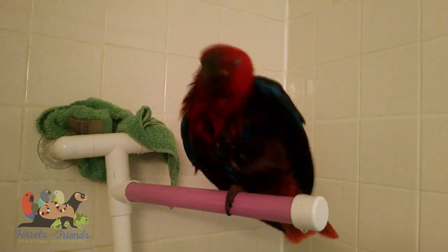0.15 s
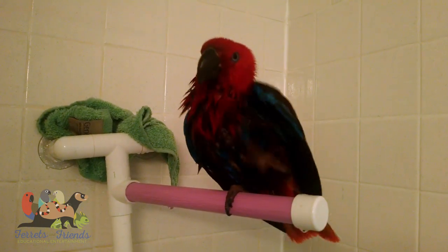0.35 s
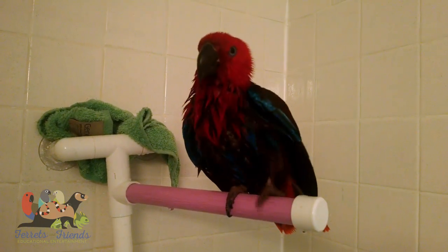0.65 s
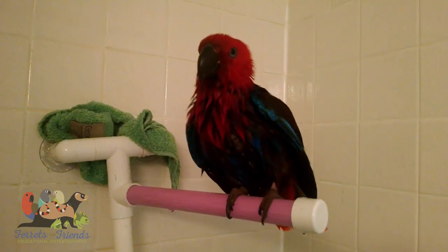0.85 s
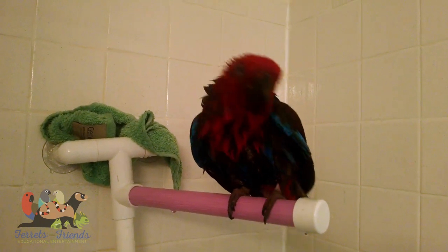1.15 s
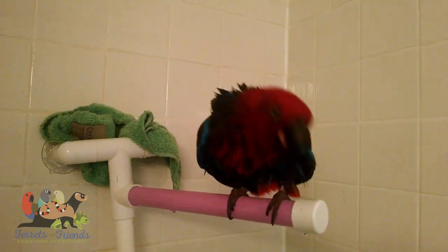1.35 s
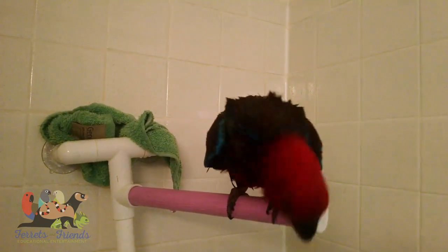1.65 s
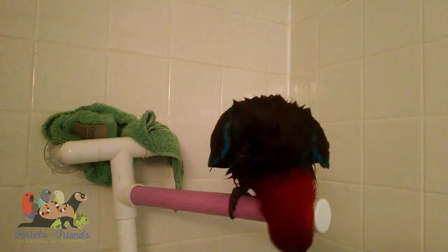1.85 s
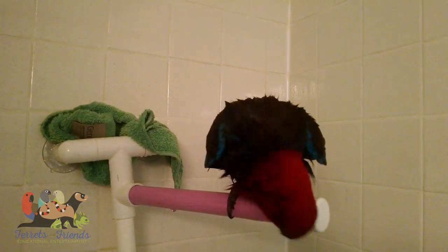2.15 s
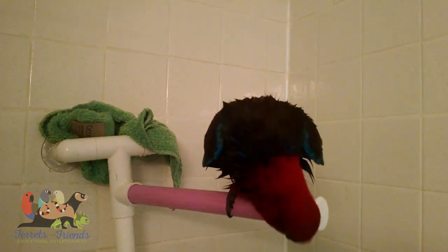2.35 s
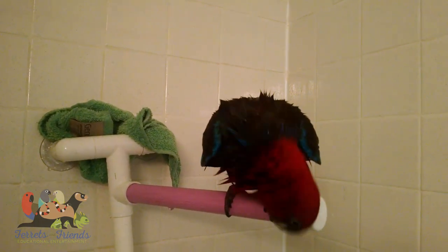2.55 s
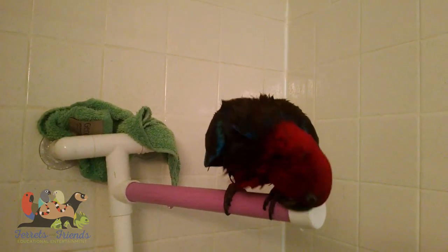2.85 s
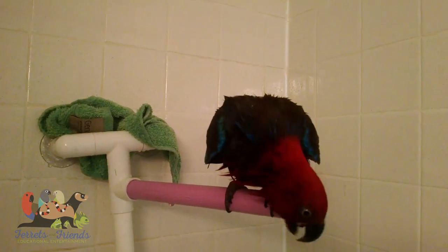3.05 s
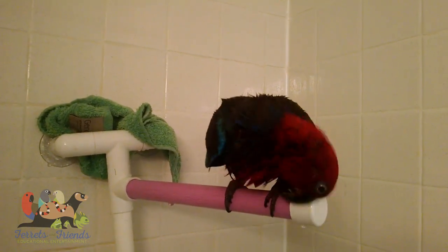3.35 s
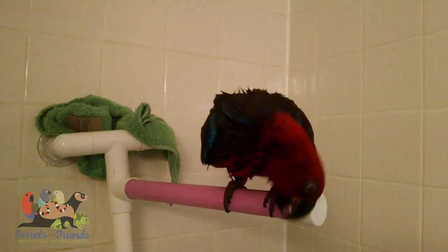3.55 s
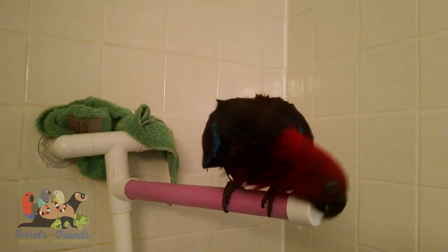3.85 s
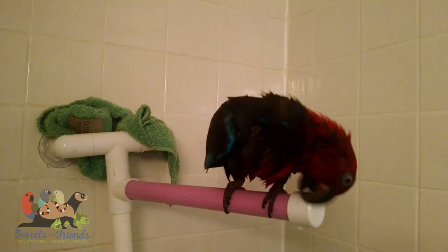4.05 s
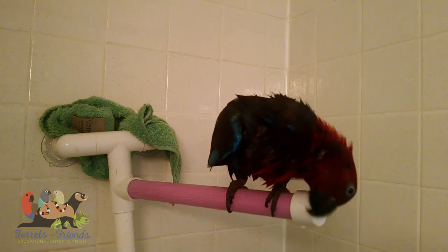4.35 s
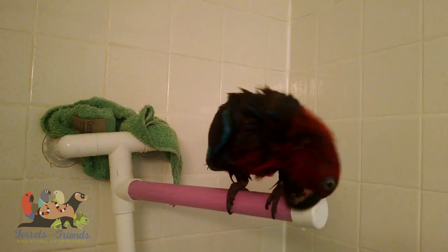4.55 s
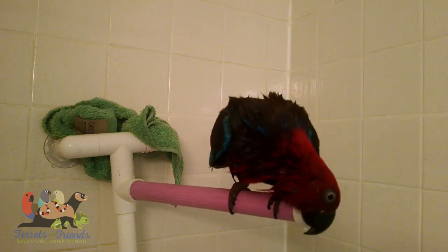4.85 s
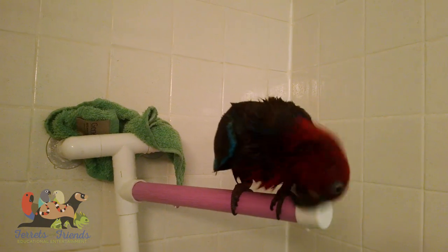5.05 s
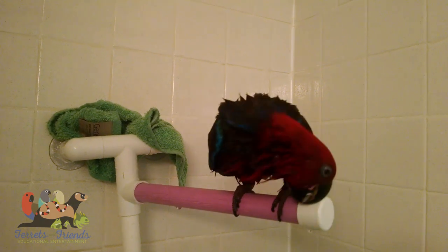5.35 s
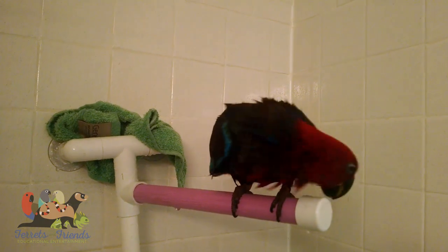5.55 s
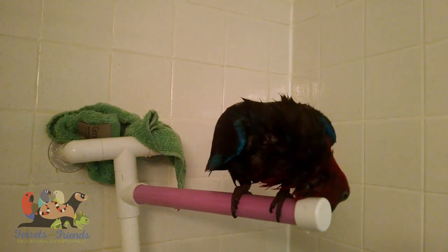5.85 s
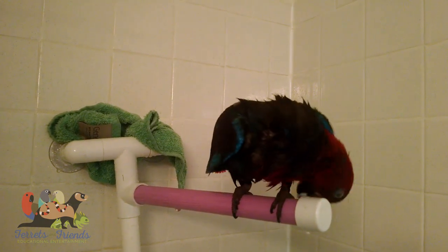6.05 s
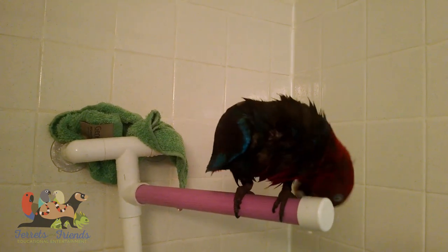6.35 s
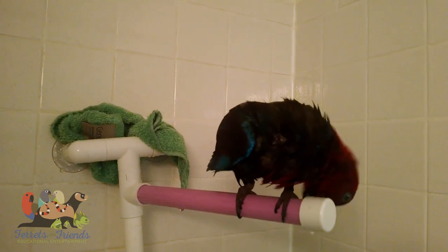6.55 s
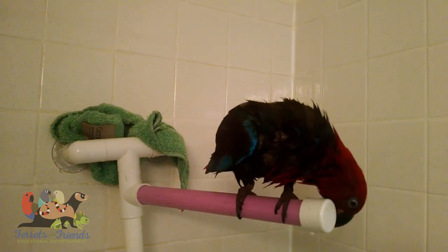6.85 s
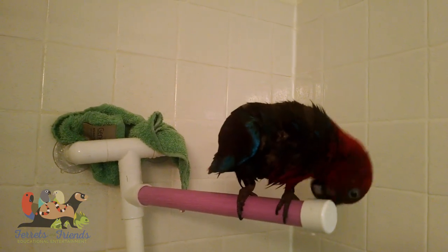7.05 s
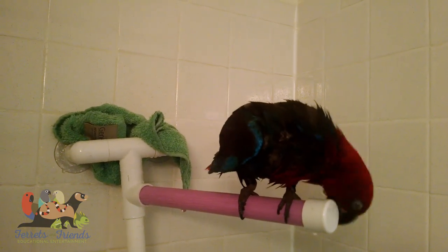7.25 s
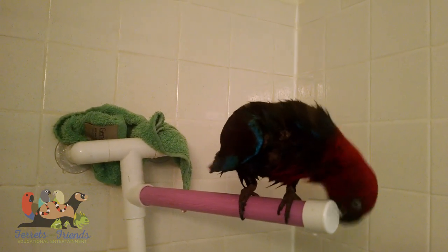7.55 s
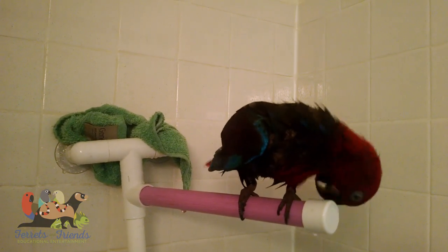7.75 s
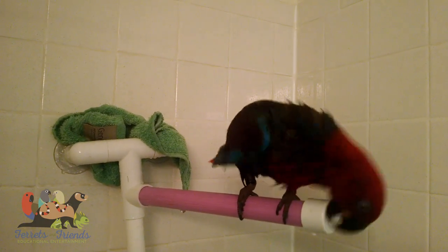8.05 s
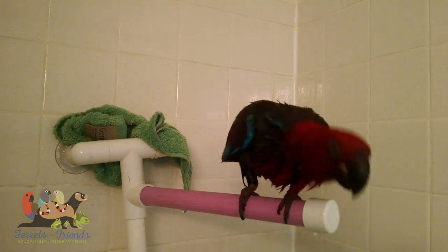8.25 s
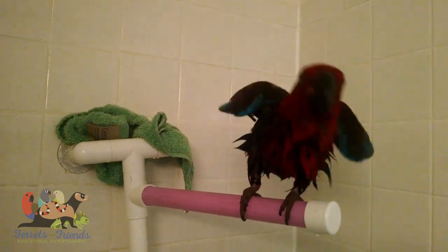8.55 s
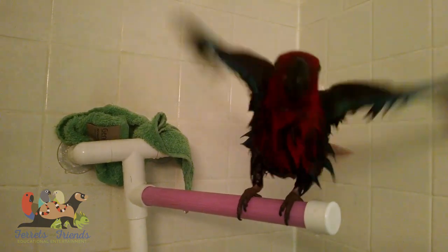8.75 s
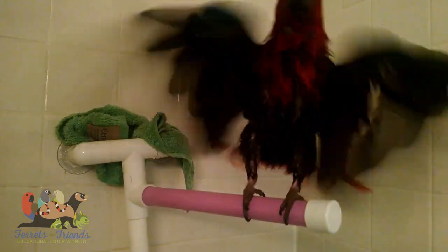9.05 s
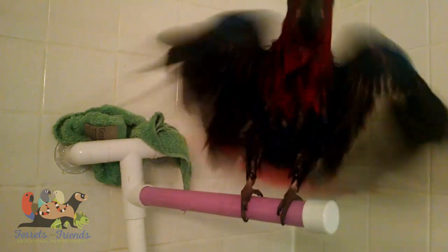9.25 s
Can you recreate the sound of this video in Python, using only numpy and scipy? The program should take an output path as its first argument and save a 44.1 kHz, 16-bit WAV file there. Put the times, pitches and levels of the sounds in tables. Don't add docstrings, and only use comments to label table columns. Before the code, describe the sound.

A steady fan drones in a tiled shower stall while a wet parrot's beak clicks and scrapes on hollow plastic, then wings flap.

```python
import sys
import numpy as np
from scipy import signal
from scipy.fft import rfft, irfft, next_fast_len
from scipy.io import wavfile
from scipy.ndimage import uniform_filter1d, map_coordinates

SR = 44100
rng = np.random.default_rng(int(sys.argv[2]) if len(sys.argv) > 2 else 0)


def bounce(signal):
    frames = np.transpose(np.atleast_2d(signal))
    limited = np.clip(frames, -1, 1)
    pcm = np.round(limited * 32767).astype(np.int16)
    wavfile.write(sys.argv[1], SR, pcm)


def makeup_ratio(level_db):
    decades = np.asarray(level_db, float) / 20
    return 10 ** decades


N = 414981


def unit(x):
    return x / np.sqrt(np.mean(x ** 2) + 1e-20)


def along(points, hz):
    f, v = np.transpose(points)
    return np.interp(np.log(hz + 1), np.log(f + 1), v)


def curves(rows):
    s, *cols = np.transpose(rows)
    return [np.interp(np.arange(N) / SR, s, c) for c in cols]


def wobble(rate):
    knots = rng.standard_normal(int(N * rate / SR) + 4)
    return map_coordinates(knots, [np.arange(N) * rate / SR])


def filtered(x, response):
    m = next_fast_len(N + SR // 2)
    return irfft(rfft(x, m) * response(np.fft.rfftfreq(m, 1 / SR)), m)[..., :N]


def resonances(modes, f):
    total = 0
    for k, (c, w, db) in enumerate(modes):
        total = total + (-1) ** k * makeup_ratio(db) * 1j * f * w / (c * c - f * f + 1j * f * w)
    return total


def diffuse(gain, alike):
    def shares(hz):
        turn = np.arccos(np.clip(along(alike, hz), -1, 1)) / 2
        return gain(hz) * np.array([np.cos(turn), np.sin(turn)])

    mid, side = filtered(rng.standard_normal((2, N)), shares)
    return np.array([mid + side, mid - side])


def fan():
    # (frequency [Hz], width [Hz], level [dB])
    stall = [(27.6, 10, -4), (60, 24, -7.5), (94.1, 5.8, -1), (119, 37, -11.5), (246.7, 14, -11),
             (266.7, 14.8, -6), (351.8, 22, 0.55), (410, 10.3, -6.5), (450.7, 36, -7.5), (492, 41, 0.5),
             (530.6, 9.7, 2.5), (583, 19, 0), (617, 24, -5), (651, 13.6, -10),
             (734.4, 23, -12.5), (788, 27, -16), (899, 17, -16), (984, 9.4, -18), (1360, 22, -56),
               (1650, 290, -31.5)]
    # (frequency [Hz], level [dB per Hz])
    air_colour = [(20, -46), (60, -18.5), (200, -23.5), (400, -26), (600, -19.5), (1000, -31), (1700, -49),
                  (2200, -42), (4500, -45), (7500, -48), (11000, -44.5), (15500, -50.5)]
    # (frequency [Hz], likeness [0-1])
    air_alike = [(30, .78), (100, .88), (250, .9), (450, .6), (900, .55), (1500, .3), (3000, .05)]
    # (frequency [Hz], likeness [0-1])
    modes_alike = [(30, .85), (120, .975), (270, .99), (360, .985), (530, .8), (750, .7), (1400, .5)]
    # (time [s], level change [dB])
    sway = [(0, 1.5), (1, -0.5), (2, -4), (2.6, 0), (3.5, 0), (4.5, 5.5), (5.5, 1.5), (6.5, 2.5), (7.5, -2),
            (8.5, -4), (9.41, 6)]

    def peaks(hz):
        power = sum(makeup_ratio(2 * db) / (1 + (2 * (hz - c) / w) ** 2) ** 1.69 for c, w, db in stall)
        return np.sqrt(power)

    drone_db = -37.5 - 0.5 * wobble(2.54)
    rumble_db = -48 + curves(sway)[0] + 0.5 * wobble(4.02)
    drone = makeup_ratio(drone_db) * unit(diffuse(peaks, modes_alike))
    air = makeup_ratio(-9.5 + 0.6 * wobble(3)) * diffuse(lambda hz: makeup_ratio(along(air_colour, hz)), air_alike)
    rumble = unit(diffuse(lambda hz: hz / (hz + 8) / (1 + (hz / 30) ** 3.1), air_alike))
    hum_phase = 2 * np.pi * 119.6 * np.arange(N) / SR + 1.76 * wobble(7)
    hum = makeup_ratio(-49.5 + 2.55 * wobble(6.5)) * np.sin(hum_phase)
    return drone + hum + air + makeup_ratio(rumble_db) * rumble


def swells(rows, sudden, rest_db, rest_bright_db):
    rise_share, sudden_rise_share = 0.52, 0.02
    fade_db = 10.5
    t = np.arange(0, N, 32) / SR
    s, db, bright_db, length = np.transpose(rows + sudden)[:, :, None]
    share = np.array([rise_share] * len(rows) + [sudden_rise_share] * len(sudden))[:, None]
    power = makeup_ratio(2 * (db - fade_db * np.abs(t - s) / np.where(t < s, length * share, length)))
    bright_power = power * makeup_ratio(2 * bright_db)
    dull, bright = [np.interp(np.arange(N) / SR, t, p.sum(axis=0)) for p in (power, bright_power)]
    rest = makeup_ratio(2 * rest_db) * np.ones(N)
    dull, bright = dull + rest, bright + rest * makeup_ratio(2 * rest_bright_db)
    return 10 * np.log10(dull), 10 * np.log10(bright / dull)


def rustle(level_db, bright_db, grain_db):
    # (frequency [Hz], level [dB per Hz])
    keratin = [(700, -9), (1300, -0.5), (3000, 10), (4500, 3.5), (7000, 12), (10000, 10.5), (13000, 5.5),
               (16000, -2.5)]
    # (frequency [Hz], level [dB per Hz])
    feather = [(2000, -18), (5000, 21.5), (6500, 13), (9000, 20.5), (11000, 13), (13000, -1), (16000, -24)]
    uneven = np.array([0.4 * wobble(70) + wobble(500), 0.35 * wobble(60) + wobble(500)])
    grains = rng.standard_normal((2, N)) * makeup_ratio(grain_db * uneven)
    dull = unit(filtered(grains[0], lambda hz: makeup_ratio(along(keratin, hz))))
    bright = unit(filtered(grains[1], lambda hz: makeup_ratio(along(feather, hz))))
    return makeup_ratio(level_db) * (dull + makeup_ratio(bright_db - 14.5) * bright)


def rubbing():
    # (time [s], level [dB])
    restless = [(0, -60), (.4, -75), (1, -70), (1.7, -61), (2.1, -75), (3.1, -65), (4, -62.5), (5, -68),
                (5.8, -62.5), (8.2, -65.5), (9.41, -58)]
    # (time [s], level [dB], brightness [dB], length [s])
    strokes = [(0.0, -47, -7, 0.033), (.1, -52.5, 9, 0.54), (.58, -49.5, 17, 0.015), (1.49, -68, 25, 0.026),
               (1.84, -61.5, 14, 0.14), (2.2, -54.5, 14, 0.17), (2.51, -60, 16, 0.034),
               (2.86, -54.5, 12, 0.088), (3.62, -62, -5, 0.12), (4.2, -50.5, 21.5, 0.031),
               (4.44, -65, 14, 0.25), (5.56, -57, 9, 0.24), (6.37, -40, 12.5, 0.03),
               (6.51, -48.5, 14.5, 0.14), (6.67, -45, 17, 0.028), (6.81, -51, 17, 0.047),
               (6.93, -46.5, 10, 0.033), (7.16, -59, 7, 0.041), (7.3, -54, 13.5, 0.19),
               (7.44, -48.5, 14, 0.064), (7.65, -42.5, 10, 0.021), (7.81, -52, 15, 0.12),
               (7.98, -48, 17, 0.02), (8.14, -53, 15, 0.029), (8.3, -68, 21, 0.1)]
    # (time [s], level [dB], brightness [dB], length [s])
    struck = [(2.16, -46.5, 19, 0.061), (3.388, -58, 2, 0.11), (4.077, -41, 14, 0.04),
              (5.071, -58, 16, 0.12), (5.321, -61, 13, 0.29), (6.089, -44, 15, 0.051),
              (6.203, -51, 17, 0.039), (6.335, -48, 17, .06)]
    rest_db, = curves(restless)
    level_db, bright_db = swells(strokes, struck, rest_db, rest_bright_db=9)
    return rustle(level_db, bright_db, grain_db=3.5)


def sparks():
    # (time [s], peak level [dB])
    flashes = [(0.0604, -42.5), (0.1406, -39), (0.2254, -48), (0.3087, -41), (1.4714, -51), (2.1585, -43),
               (4.0776, -31), (4.2028, -40), (5.0704, -25), (5.5638, -39), (6.0886, -35), (6.2018, -30),
               (6.3345, -40), (6.6692, -40), (7.9583, -33), (8.1414, -40), (8.9361, -28), (9.0224, -28),
               (9.1521, -25), (9.3182, -32)]
    length_s, edge_hz, gain_db = 0.0028, 9000, -3
    out, t = np.zeros(N + SR), np.arange(SR // 100) / SR
    for s, db in flashes:
        burst = np.exp(-(t / length_s) ** 2) * rng.standard_normal(len(t))
        out[round(s * SR):][:len(t)] += makeup_ratio(db + gain_db) * burst
    return filtered(out[:N], lambda f: (1j * f / edge_hz / (1 + 1j * f / edge_hz)) ** 2)


def gritty_strokes(rows, grit_db, size):
    out, t = np.zeros(N + SR), np.arange(-SR // 8, SR // 8) / SR
    for s, spread, hz, db, edge in rows:
        noise = rng.standard_normal(len(t))
        unevenness = unit(uniform_filter1d(rng.standard_normal(len(t)), size))
        grit = noise * makeup_ratio(grit_db * unevenness)
        edge = max(edge, 1.03)
        band = signal.butter(2, [hz / edge, min(hz * edge, 15000)], "band", fs=SR)
        stroke = makeup_ratio(db) * np.exp(-(t / spread) ** 2) * unit(signal.lfilter(*band, grit))
        at = round((s + t[0]) * SR)
        out[max(at, 0):at + len(t)] += stroke[max(-at, 0):]
    return out[:N]


def blunted(x):
    return filtered(x, lambda f: 1 / (1 + 1j * f / 12000) ** 2)


def crunches():
    # (middle [s], spread [s], frequency [Hz], level [dB], band edge over centre [ratio])
    bites = [(.0605, 0.0033, 5550, -31.5, 2.0), (.1425, 0.003, 6500, -31, 1.9),
             (.2265, 0.004, 5940, -35.5, 1.5), (.3112, 0.0041, 6000, -38, 1.8),
             (2.2055, 0.003, 5000, -37, 2), (4.2022, 0.0021, 6040, -29, 1.9),
             (5.4075, 0.012, 9500, -45.5, 1.3), (5.645, 0.007, 4320, -44.5, 1.1),
             (6.0095, 0.0092, 4170, -43.5, 1.45), (6.094, 0.0058, 6000, -29.5, 1.5),
             (6.337, 0.0024, 4800, -34, 2.6), (6.499, 0.0045, 5030, -29.5, 2),
             (6.629, 0.0049, 4500, -34, 2.5), (6.6405, 0.0058, 3960, -33.5, 1.7),
             (6.653, 0.004, 4500, -31.5, 2.1), (6.926, 0.0044, 5000, -45, 1.07),
             (8.145, 0.0041, 5100, -35.5, 2.6), (8.466, 0.012, 8900, -37.5, 1.45),
             (8.557, 0.0047, 9350, -36, 1), (8.936, 0.0032, 9500, -25, 1.56),
             (8.983, 0.005, 7500, -27, 2.4), (9.016, 0.0034, 7000, -21, 1.9),
             (9.045, 0.0058, 8500, -24, 1.14), (9.14, .004, 6500, -24.5, 1.4),
             (9.183, .003, 7000, -24.5, 2.3), (9.322, 0.0042, 6000, -25.5, 1.8),
             (9.36, 0.0036, 5500, -29.5, 2.2)]
    return blunted(gritty_strokes(bites, grit_db=4.0, size=14))


def needles():
    # (time [s], peak level [dB], pitch [Hz])
    sharp_ticks = [(0.0616, -19, 5000), (.1425, -26, 6000), (.3105, -27, 5000), (0.48, -21, 4280),
                   (.921, -38, 6000), (1.472, -27, 7000), (1.575, -43, 5200), (1.7402, -32, 9000),
                   (1.837, -37, 4500), (2.1595, -21.5, 4000), (2.5658, -37, 3800), (2.7083, -37, 5500),
                   (3.3886, -22.5, 3970), (3.4114, -35, 4500), (3.7883, -47, 6000), (3.8785, -40, 6000),
                   (4.0789, -11.5, 5000), (4.081, -26, 6000), (4.204, -28, 5000), (4.3802, -37, 5500),
                   (4.8124, -35, 8000), (4.9486, -34, 5200), (4.9556, -32, 5200), (5.0714, -29, 6040),
                   (5.1052, -37, 6000), (5.3252, -22, 9000), (5.564, -20, 9500), (5.9443, -40, 5000),
                   (6.1082, -20, 4200), (6.2054, -20, 9500), (6.3792, -11.5, 3420), (6.4562, -22, 9500),
                   (6.6702, -16, 3500), (6.6705, -24, 8000), (6.8116, -31, 9500), (7.1205, -25, 9500),
                   (7.3015, -27, 7000), (7.4515, -29, 6000), (7.656, -28, 9000), (7.7792, -29, 4000),
                   (7.8087, -26, 5000), (7.9587, -17, 9000), (8.5437, -26, 6000), (8.5593, -26, 9000),
                   (8.583, -29, 6000), (8.603, -25, 6000), (8.66, -17.5, 6260), (8.6638, -18.5, 6100),
                   (8.6702, -30, 6400), (8.677, -31, 6400), (8.938, -23, 9500), (9.023, -9, 8600),
                   (9.043, -14, 8800), (9.087, -26, 9000), (9.153, -23, 9000), (9.1804, -17, 6000),
                   (9.321, -13, 6400), (9.358, -13.5, 6000)]
    fall_cycles, rise_cycles = 3.6, 0.4
    out, t = np.zeros(N), np.arange(SR // 200) / SR
    for s, db, hz in sharp_ticks:
        shape = makeup_ratio(8 - 40 * hz * t / fall_cycles) * (1 - np.exp(-hz * t / rise_cycles))
        out[round((s - 0.0002) * SR):][:len(t)] += makeup_ratio(db) * shape * np.sin(2 * np.pi * hz * t)
    return out


def contacts():
    # (time [s], peak level [dB], ring [Hz], knock [dB])
    knocks = [(0.1412, -36.5, 3680, -8), (0.2258, -32, 6700, -9.5), (0.3092, -37, 6130, -10),
              (1.465, -41, 6370, -8), (2.159, -27, 3800, -4), (2.2047, -31, 5000, -4.5),
              (2.4625, -49, 3390, -3), (2.565, -49, 3810, -1), (2.821, -47, 3300, 8), (3.337, -47, 3040, 2),
              (3.3871, -38.5, 3620, -0.5), (4.0777, -22, 3440, -11), (4.2017, -32, 4000, -2),
              (5.07, -31, 4750, -4), (5.5644, -40.5, 4270, 6), (6.089, -29, 6000, -4),
              (6.107, -21.5, 3370, -14), (6.2024, -21, 9900, -17), (6.335, -28, 4200, -5),
              (6.5, -39.5, 4300, -1), (6.6285, -36, 4030, 0), (6.64, -31.5, 3700, 3.5),
              (6.8105, -32, 9400, -9), (7.2479, -45, 3080, -5), (7.3012, -35, 9500, -6),
              (7.946, -35, 3200, -15), (7.9591, -25.5, 9650, -8.5), (8.142, -36, 4950, -2.5)]
    # (time [s], peak level [dB], ring [Hz], knock [dB])
    snaps = [(2.658, -47, 3940, -14), (8.252, -46, 8820, -17), (8.4377, -50, 6370, -20),
             (8.6642, -46.5, 6430, 8.5), (8.846, -49, 6380, -9), (8.8865, -40, 8900, -18),
             (8.98, -36, 7000, -10), (9.18, -41, 5100, -8), (9.3191, -27.5, 6660, -4),
             (9.3556, -34, 4370, -1)]
    # (time [s], peak level [dB], ring [Hz], scrape [dB])
    ticks = [(0.417, -42.5, 9170, -14), (0.48, -32, 4150, -37), (1.632, -43, 3900, -38),
             (1.836, -38, 4400, -28), (2.539, -41, 3990, -29), (2.7063, -39.5, 6900, -19),
             (4.9558, -36, 5000, -30), (5.3213, -41.5, 9450, -17.5), (5.638, -37.5, 4350, -9.5),
             (5.944, -45, 4230, -10), (6.1868, -43, 4400, -6), (6.3781, -33.5, 3380, -12.5),
             (6.447, -34.5, 10000, -20), (6.6694, -22.5, 3350, -25), (6.9057, -46, 6900, -8),
             (7.098, -48, 4120, -3.5), (7.1244, -29.5, 3750, -22), (7.4403, -35, 3740, -11),
             (7.45, -37.5, 4400, -18), (7.655, -37, 9350, -32), (7.763, -50, 6340, -8),
             (7.8008, -37.5, 3580, -13), (8.122, -44, 4600, -13)]

    def slide_db(db):
        return -55.5 + 0.61 * (db + 35) - db

    struck = [(s, db, hz, knock_db, slide_db(db)) for s, db, hz, knock_db in knocks + snaps]
    return struck + [(s, db, hz, -28, scrape_db) for s, db, hz, scrape_db in ticks]


def beak():
    # (frequency [Hz], width [Hz], level [dB])
    perch = [(1280, 71, 19), (1480, 1000, 24.5), (2880, 400, 27)]
    out, blows, t = np.zeros(N + SR), np.zeros(N), np.arange(SR // 8) / SR
    for s, db, hz, knock_db, scrape_db in contacts():
        grit = rng.standard_normal((2, len(t)))
        band = signal.butter(2, [hz * 0.45, min(hz * 2.2, 14000)], "band", fs=SR)
        tick, scrape = signal.lfilter(*band, grit)
        ring = np.sin(2 * np.pi * hz * t) * makeup_ratio(-60 * t / 0.002)
        wide = signal.lfilter(*signal.butter(1, [2200, 9500], "band", fs=SR), grit[1, ::-1])
        crack = (0.25 * tick + 0.092 * wide) * np.exp(-(t / 0.0019) ** 2)
        scrape = makeup_ratio(scrape_db - 60 * t / 0.2) * (1 - np.exp(-t / 0.00051)) * unit(scrape)
        at = round((s + 0.0008) * SR)
        contact = makeup_ratio(-0.5) * ring + makeup_ratio(2.0) * crack + makeup_ratio(-4) * scrape
        out[at:][:len(t)] += makeup_ratio(db + 12.5) * contact
        blows[at] = makeup_ratio(db + knock_db + 10)
    return blunted(out[:N]) + filtered(blows, lambda f: resonances(perch, f))


def drips():
    # (time [s], level [dB], pitch [Hz], time to die 60 dB [s])
    drops = [(0.547, -34.5, 2870, 0.088), (1.631, -35, 3160, 0.11), (1.64, -43.5, 3670, 0.07),
             (1.929, -35, 2880, 0.066), (2.634, -36, 1840, 0.054), (5.702, -31, 2770, 0.089),
             (5.639, -36, 3210, 0.046), (7.249, -33, 2980, 0.064)]
    out, t = np.zeros(N), np.arange(SR // 6) / SR
    for s, db, hz, t60 in drops:
        waver = 1 + 0.028 * unit(uniform_filter1d(rng.standard_normal(len(t)), 120))
        tone = np.sin(2 * np.pi * hz * np.cumsum(waver) / SR)
        out[round(s * SR):][:len(t)] += makeup_ratio(db - 60 * t / t60) * (1 - np.exp(-t / 0.00025)) * tone
    return out


def wipes():
    # (middle [s], spread [s], frequency [Hz], level [dB], band edge over centre [ratio])
    slides = [(1.491, .018, 5440, -63, 1.3), (1.597, .024, 5030, -61, 1.16),
              (2.204, 0.017, 4540, -42.5, 1.8), (2.5, 0.04, 5450, -56, 1.23),
              (2.885, 0.016, 5200, -57, 1.1), (3.647, 0.071, 2520, -55, 1.9), (4.41, .035, 5330, -60, 1.06),
              (4.49, .03, 5440, -57, 1.14), (4.653, 0.024, 4840, -53, 1.65),
              (4.973, 0.016, 5200, -47.5, 1.1), (5.482, 0.022, 4200, -45.5, 2.5),
              (5.825, 0.013, 5000, -57, 0.88), (5.822, .012, 7260, -51, 1.3), (5.917, .01, 2570, -51, 1.14),
              (5.65, 0.014, 7860, -52, 1.08), (2.505, 0.025, 9400, -55.5, 1.12),
              (2.885, .012, 3600, -60, 0.88), (8.375, 0.021, 9000, -54, 1.9), (9.22, 0.048, 9000, -52, 1.3),
              (6.53, 0.028, 4600, -47, 1.6), (6.91, 0.0083, 7340, -46, 1.1), (7.06, .02, 5100, -59, 1.3),
              (7.147, 0.042, 6600, -42, 1.53), (7.459, 0.025, 4800, -50.5, 1.35),
              (7.62, 0.034, 4900, -52, 1.5), (7.818, 0.014, 5100, -41.5, 2), (8.13, 0.02, 4530, -58, 0.81),
              (8.585, 0.062, 5800, -51, 1.13), (8.68, 0.022, 6300, -57, 0.9),
              (9.163, 0.012, 5950, -35.5, 1.05)]
    return gritty_strokes(slides, grit_db=5.5, size=60)


def thumps():
    # (time [s], level [dB], frequency [Hz])
    jolts = [(2.2, -45, 110), (6.33, -49, 80), (7.0, -48, 55), (7.55, -45, 60), (7.95, -44, 70),
             (3.873, -40, 69), (4.14, -39, 60), (4.221, -57, 90), (5.58, -41.5, 101), (6.113, -46, 111),
             (6.679, -44, 110), (8.16, -46.5, 113), (9.02, -33, 160), (9.157, -54, 59), (9.172, -41, 170),
             (9.27, -43, 207), (9.32, -40.5, 50)]
    out, t = np.zeros((2, N + SR)), np.arange(SR // 4) / SR
    for s, db, hz in jolts:
        band = signal.butter(1, [hz * 1.3, hz * 1.59], "band", fs=SR)
        puff = unit(signal.lfilter(*band, rng.standard_normal((2, len(t)))))
        out[:, round(s * SR):][:, :len(t)] += makeup_ratio(db - 60 * t / 0.62) * (1 - np.exp(-t / 0.0004)) * puff
    return out[:, :N]


def wings():
    # (time [s], level [dB], brightness [dB], length [s])
    flaps = [(8.46, -49, 11, 0.086), (8.556, -43.5, 7, 0.071), (8.66, -67, -12, 0.033),
             (8.9, -50.5, -1, 0.1), (8.96, -46, 12, .08), (9.025, -34, 15, 0.14), (9.155, -37.5, 10, 0.095),
             (9.24, -45, 7, 0.15), (9.33, -39, 12.5, 0.24)]
    # (frequency [Hz], likeness [0-1])
    push_alike = [(30, .75), (300, .8)]
    push_db, gust_db, gust_lag_s = -33, -41, 0.11
    swish_db, bright_db = swells(flaps, [], -100, 0)
    push = unit(diffuse(lambda hz: hz / (hz + 10) / (1 + (hz / 90) ** 1.15), push_alike))
    gust_noise = rng.standard_normal((2, N))
    gust = unit(filtered(gust_noise, lambda hz: hz / (hz + 8) / (1 + (hz / 30) ** 1.2)))
    force = makeup_ratio(1.53 * (swish_db + 35))
    late = np.pad(force, (round(gust_lag_s * SR), 0))[:N]
    swish = rustle(swish_db, bright_db, grain_db=4)
    return swish, makeup_ratio(push_db) * force * push + makeup_ratio(gust_db) * late * gust


def tiles(x):
    # (frequency [Hz], time to die 60 dB [s])
    decay = [(500, 0.22), (3000, 0.17), (8000, 0.1), (15000, 0.029)]
    out, step = np.zeros((2, N + 2 * SR)), SR // 6
    for i in range(0, N, step):
        hz, t, z = signal.stft(rng.standard_normal((2, SR // 4)), SR, nperseg=256)
        fade = makeup_ratio(-60 * t / along(decay, hz)[:, None])
        tail = signal.istft(z * fade, SR, nperseg=256)[1]
        wet = signal.fftconvolve(x[None, i:i + step], tail / np.linalg.norm(tail[0]), axes=1)
        out[:, i + 90:i + 90 + wet.shape[1]] += wet
    return out[:, :N]


def scene():
    swish, push = wings()
    clicks = beak() + crunches()
    rubs = rubbing() + wipes() + swish
    points = needles() + drips() + sparks()
    bird = clicks + rubs + points
    direct = np.array([0.4 * np.roll(bird, 9), bird])
    brief = clicks + points
    corner = 0.034 * np.array([np.roll(brief, 70), np.roll(brief, 95)])
    sharp = makeup_ratio(-7) * clicks + makeup_ratio(-9) * points
    return direct + corner + tiles(sharp + makeup_ratio(0.5) * rubs) + push + thumps() + fan()


def top_cut(x):
    return signal.sosfilt(signal.butter(12, 16640, fs=SR, output="sos"), x)


def record(dry):
    # (frequency [Hz], gain [dB])
    shade = [(100, -.5), (600, -.5), (1500, -3), (5000, -3), (15000, -2.5)]
    # (frequency [Hz], gain [dB])
    cross = [(100, -4), (600, -2), (1300, -1.5), (2600, -.3), (4000, -1.5), (5200, -3), (7000, -7.5),
             (10000, -9), (15000, -11)]
    # (frequency [Hz], delay [s])
    lag = [(2600, 384e-6), (5200, 377e-6), (7900, 380e-6), (10800, 370e-6), (13800, 362e-6)]
    # (frequency [Hz], gain [dB])
    trim = [(30, -4.5), (120, -3), (500, -2), (1000, -.5), (2600, -.6), (3600, -3), (4400, -1), (6200, -2),
            (9000, -8), (12000, -6), (14000, -2.5)]
    # (frequency [Hz], phase [radians])
    port_lead = [(90, .7), (170, .5), (260, 0), (450, .45), (650, .4), (860, .1), (1200, 0)]

    def other_port(stretch):
        def delay(hz):
            return makeup_ratio(along(cross, hz)) * np.exp(-2j * np.pi * hz * along(lag, hz) * stretch)
        return filtered(ports[::-1], delay)

    def finish(hz):
        top = np.where(hz < 15500, 1, makeup_ratio(-21) * (hz < 16600))
        left_gain = makeup_ratio(along(trim, hz)) * np.exp(1j * along(port_lead, hz))
        return top * np.array([left_gain, hz * 0 + 1])

    left = filtered(dry[0], lambda hz: makeup_ratio(along(shade, hz)))
    ports = np.array([left, dry[1]])
    lag_drift = 0.033
    short, long = other_port(1 - lag_drift), other_port(1 + lag_drift)
    drift = 0.5 + 0.5 * np.tanh(2 * wobble(8))
    steered = ports - drift * long - (1 - drift) * short
    hiss = filtered(rng.standard_normal((2, N)), lambda hz: 1 / (1 + (7500 / (hz + 1)) ** 4))
    stray = filtered(rng.standard_normal((2, N)), lambda hz: 1 / (1 + ((hz - 2600) / 450) ** 4))
    noise = makeup_ratio(-71.0) * hiss + makeup_ratio(-66 + 7 * wobble(10)) * stray
    mix = filtered(steered + noise, finish)
    return top_cut(mix)


dry = scene()
out = record(dry)
bounce(out)
```